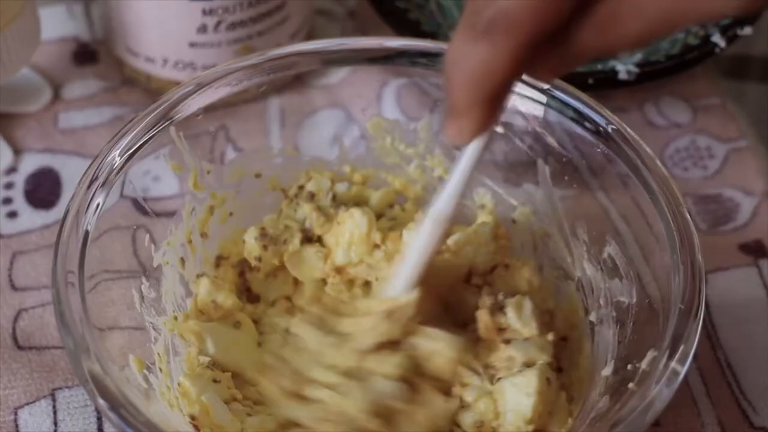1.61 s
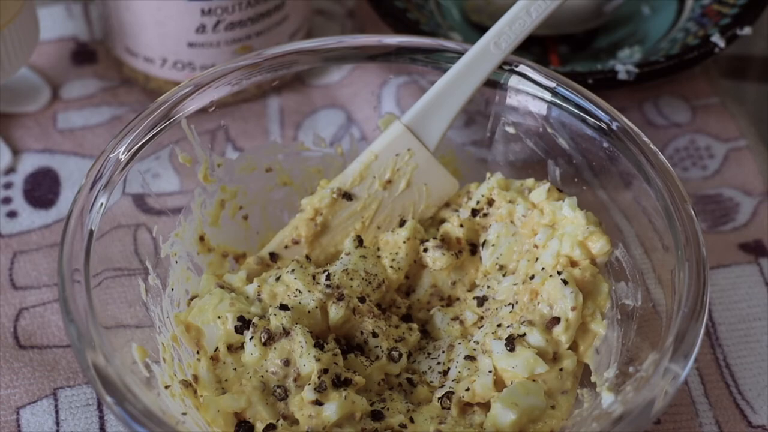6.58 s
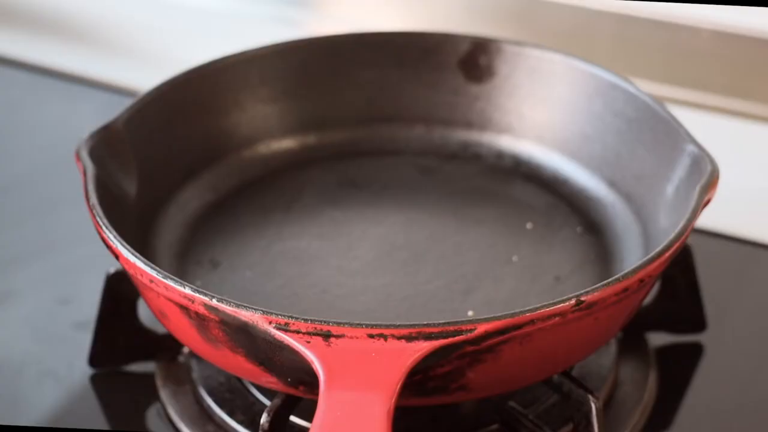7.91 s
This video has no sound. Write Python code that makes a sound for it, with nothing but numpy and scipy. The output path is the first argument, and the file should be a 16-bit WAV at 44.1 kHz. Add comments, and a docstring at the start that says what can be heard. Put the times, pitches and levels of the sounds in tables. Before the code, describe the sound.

After a metal spoon rattles down, soft wet stirring clicks give way to a pepper mill crunching peppercorns over a low hum.

```python
"""A metal spoon drops into a dish, clinks and rattles to rest. A silicone spatula then stirs mashed
egg in a glass bowl: air pockets pop in small wet clicks over a sticky crackle. Last, a pepper mill
is twisted over the bowl, its burr hissing as peppercorns snap and ring its body.
A few knocks on the kitchen table; a low mains hum, room rumble and microphone hiss throughout."""
import sys
import numpy as np
from scipy import signal
from scipy.fft import rfft, irfft
from scipy.io import wavfile
from scipy.ndimage import uniform_filter1d

SR = 44100
rng = np.random.default_rng(int(sys.argv[2]) if len(sys.argv) > 2 else 0)


def store_pcm(level_fs):
    """Save levels as 16-bit WAV."""
    pcm = np.round(np.clip(level_fs, -1, 1) * 32767).astype(np.int16)
    wavfile.write(sys.argv[1], SR, np.atleast_2d(pcm).T)


N = 355446
TIME = np.arange(N) / SR
SHORT = TIME[:SR // 2]

# Mill twists. Each row: start in s, length in s, burr rub in dB, time of a bite in s, its crunch in dB.
TWISTS = [(4.328, 0.33, -41, 4.55, -38), (4.825, 0.13, -45.5, 4.93, -32), (5.236, 0.32, -43, 5.36, -35.5),
          (5.584, 0.41, -44, 5.78, -33), (5.935, 0.39, -62, 5.99, -53.5), (6.258, 0.081, -43, 5.5, -53),
          (6.418, 0.24, -42, 6.54, -73), (7.315, 0.38, -50, 7.45, -61), (7.722, 0.047, -47, 7.92, -46)]


def mill():
    """Peppercorns snap, split their husks and ring the mill's body; the grist crunches at each bite."""
    # Each row: time in s, snap level in dB, snap centre in Hz, body level in dB.
    cracks = [(4.4160, -9.5, 3020, -11.5), (4.476, -22, 1890, -22), (4.4940, -12.5, 3580, -11.5),
              (4.499, -6.5, 2920, -15.5), (4.849, -27, 1570, -33), (4.87, -19.5, 1360, -27),
              (4.884, -40, 3000, -26), (4.915, -24, 2200, -43), (4.9417, -8, 5200, -11.5),
              (4.9424, -4.5, 3170, -12), (5.286, -24, 3630, -42), (5.292, -27, 2000, -28),
              (5.304, -29, 1930, -11), (5.339, -28, 2400, -27), (5.3509, -6.5, 2520, -13),
              (5.354, -11, 9700, -24), (5.433, -16.5, 2030, -19.5), (5.7267, -2, 4800, -6),
              (5.729, -8.5, 6200, -12), (5.743, -22, 3500, -11.5), (5.812, -10, 5130, -32),
              (5.8255, -14, 2580, -12.5), (5.8320, -14.5, 4370, -9), (5.9237, -18.5, 3830, -26),
              (6.324, -39, 1600, -56), (7.43, -29.5, 1700, -33), (7.45, -30, 1680, -38),
              (7.496, -31, 1460, -53), (7.842, -41, 2490, -37), (7.892, -36, 3740, -39)]
    # Each row: frequency in Hz, level in dB, T60 in s.
    body_modes = [(335, -5, .026), (395, -4, .026), (560, -10, .014), (800, -7, .013), (1090, -2, .05),
                  (1160, -1, .065), (1440, 3, .022), (1800, 6, .011), (2170, 6, .02), (2960, 6, .036),
                  (3130, 3, .028), (3770, -2, .013), (4330, 5, .022), (5450, 0, .015), (6700, -6, .01)]
    # Each row: frequency in Hz, gain in dB.
    grist_spectrum = [(150, 12), (330, -8), (600, -3.5), (1200, 1), (1800, -2.5), (3000, 1.5), (5000, -15),
                      (8000, -29), (14000, -31)]
    body_pan_db, snap_pan_db = -4.5, 1.7  # body sits right of the mouth
    bites = sum(amp(db) * swell(s, half_s=0.054) for _, _, _, s, db in TWISTS)
    loose_grist = amp(-13) * twisting()
    grist = evened(colour(grains(per_s=1100, spread_db=4), grist_spectrum))
    out = pan(grist * (bites + loose_grist), body_pan_db)
    for s, snap_db, hz, body_db in cracks:
        fade_s = min(0.00072 * 2 ** (-snap_db / 8), 0.0056)  # hard corns break at once, weak ones crumble
        crack = snap(hz, fade_s, breadth=1.45, front=1.1)
        husk = amp(-9.5) * snap(hz=7000, fade_s=0.005, breadth=3.3)
        body = amp(body_db) * ring(body_modes, detune=0.06)
        add(out, s, pan(amp(snap_db) * (crack + husk), snap_pan_db) + pan(body, body_pan_db))
    return colour(out, [(40, -28), (150, -39), (290, 0.5), (1000, -1.5)])  # little bass below about 300 Hz


def burr():
    """The hard burr hisses as it rubs in its ring and sings thinly in fits; grit skids along it."""
    # Each row: frequency in Hz, gain in dB.
    rub_spectrum = [(1500, -6), (4000, 0.5), (5400, 4.5), (7000, 6), (8000, -2), (9000, 6), (11500, 10.5),
                    (12400, -17), (13500, -25)]
    grit_spectrum = [(1500, -13), (3800, -25), (4800, 7), (6200, 7.5), (7500, 2), (9000, 3), (12000, -17)]
    # Each row: frequency in Hz, level in dB, T60 in s.
    burr_modes = [(7440, 1, 0.015), (13000, -1, 0.0095)]
    # Each row: start in s, level in dB, fade in s.
    skids = [(6.161, -45, .016), (6.257, -39.5, 0.013), (6.295, -36, .004), (6.305, -30.5, 0.01),
             (6.322, -44, 0.036), (6.346, -38, 0.0091), (6.36, -39, 0.0074), (6.3724, -26, 0.0026)]
    skid_attack_s = 0.0007
    hiss = np.array([colour(grains(per_s=1200, spread_db=10), rub_spectrum) for _ in range(2)])
    tones = np.array([excite(grains(per_s=1500, spread_db=6.5), ring(burr_modes)) for _ in range(2)])
    fits = amp(4 * drift(hz=25))
    rub = amp(-3.5) * evened(hiss) + amp(0.5) * evened(tones * fits)
    grit = evened(colour(grains(per_s=6800, spread_db=4.5), grit_spectrum))
    skidding = sum(amp(db) * held(s, skid_attack_s, skid_attack_s, fade_s) for s, db, fade_s in skids)
    return rub * (twisting() + amp(-3) * skidding) + grit * skidding


def twisting():
    """Rub envelope: each twist of the wrist builds, holds and lets go."""
    return sum(amp(db) * held(s, length_s, attack_s=0.044, release_s=0.028)
               for s, length_s, db, _, _ in TWISTS)


def spoon():
    """The spoon lands handle first, bounces and chatters to rest; each channel has its own mode mix."""
    # Each row: time in s, ring in dB, tick in dB, tick centre in Hz, handle's share of the blow (0-1).
    hits = [(.7062, -7.5, -17.5, 4200, 1), (.8020, -28, -28, 5000, .7), (.8572, -3, -6.5, 10500, .1)]
    # Each row: start in s, length in s, level in dB, handle's share (0-1).
    rattles = [(.708, .008, -27.5, 1), (.802, .05, -34, .55), (.860, .148, -23, 0), (1.02, .018, -31, 0)]
    out = np.zeros((2, N))
    for channel in out:
        for s, length_s, db, handle in rattles:
            force = amp(db) * held(s, length_s, attack_s=0.0014, release_s=0.011)
            channel += chatter(spoon_modes(handle), force)
        for s, ring_db, tick_db, hz, handle in hits:
            clink = amp(ring_db) * ring(spoon_modes(handle), detune=0.002)
            tick = amp(tick_db) * snap(hz, fade_s=0.012, breadth=2.4, front=0.3)
            add(channel, s, clink + tick)
    return pan(out, db=0.8)


def spoon_modes(handle):
    """Modes of spoon on dish for a blow between the spoon's bowl (0) and its handle (1)."""
    # Each row: frequency in Hz, level for a handle blow in dB, for a bowl blow in dB, T60 in s.
    modes = [(700, -16, -29, .15), (1770, 0, -9, .09), (1814, -6, -6, .33), (2150, -15, -23, .06),
             (2330, -16, -25, .06), (2640, -11, -21, .06), (2900, -12, -23, .06), (3310, -14, -16, .08),
             (3720, -14, -22, .06), (3985, -11, -3, .08), (4016, -8, -1, .17), (5144, -7, -2.5, .11),
             (5240, -18, -6, .08), (5500, -15, -16, .12), (5720, -15, -18, .12), (6480, -16, -14, .09),
             (6735, -18, -6, .08), (6788, -18, -5.5, .18), (6900, -4, -8, .11), (7380, -20, -2, .15),
             (7600, -18, -15, .12), (8560, -18, -11, .1), (8912, -5, -8, .13), (9722, -22, -8, .11),
             (9840, -13, -1.5, .15), (10181, -20, -7, .13), (10448, -22, -3.5, .2), (11343, -20, 1, .17),
             (11950, -2, -22, .05), (12380, -10, -26, .08), (13340, -25, 0, .13), (14130, 0, -16, .04),
             (15450, -8, -6, .08)]
    return [(hz, handle * handle_db + (1 - handle) * bowl_db, t60_s)
            for hz, handle_db, bowl_db, t60_s in modes]


def chatter(modes, force, points=4):
    """Rapid contacts: free modes ring on unsteadily while a few touching points buzz and scrape."""
    # Each row: frequency in Hz, gain in dB.
    scrape_spectrum = [(500, -63), (2000, 11), (4700, 1), (7000, 17), (10000, 8), (11600, 2), (12600, -20)]
    contacts = np.array([evened(grains(per_s=220, spread_db=1.5)) for _ in range(points)])
    contacts = contacts * force / np.sqrt(points)
    damping = np.exp(-SHORT / 0.01)  # pressed on the dish, modes are damped and detuned
    buzz = sum(excite(point, ring(modes, detune=0.04) * damping) for point in contacts)
    scrape = evened(colour(grains(per_s=450, spread_db=3.5), scrape_spectrum)) * force
    free = sum(excite(point, ring(modes, detune=0.003)) * amp(3 * drift(hz=45) - 1) for point in contacts)
    return free + amp(-4.5) * buzz + amp(-8.5) * scrape


def spatula():
    """Air pockets pop as the spatula folds the egg, over a sticky crackle and a dull squash."""
    # Each row: middle of a stroke in s, crackle level in dB.
    strokes = [(1.759, -63), (1.98, -55), (2.25, -55.5), (2.53, -58), (2.801, -52), (3.031, -68),
               (3.389, -54), (3.678, -82), (4.101, -79)]
    # Loudest wet clicks. Each row: time in s, level in dB, centre in Hz, fade in s, band edge / centre.
    squelches = [(1.693, -30.5, 7100, .002, 1.5), (1.725, -25, 4640, 0.014, 2.3),
                 (1.829, -33, 5600, 0.0003, 1.7), (1.867, -35, 4500, 0.00041, 2.3),
                 (1.926, -34, 3020, 0.00053, 1.7), (1.947, -31.5, 5460, 0.0036, 2.1),
                 (2.113, -33.5, 5600, 0.00037, 1.8), (2.178, -35, 7960, .001, 1.1),
                 (2.199, -21.5, 6400, 0.0015, 1.44), (2.205, -23, 3880, 0.016, 2.7),
                 (2.366, -31, 6400, .0012, 2.1), (2.421, -37, 7950, 0.0011, 0.93),
                 (2.472, -28, 5300, 0.0013, 1.35), (2.568, -44, 7040, .0006, 1.4),
                 (2.684, -41, 3400, 0.0017, 2.3), (2.756, -35, 2800, 0.00043, 2.7),
                 (2.761, -38, 4800, 0.0024, 2.3), (2.798, -43, 3200, 0.0022, 2.4),
                 (2.855, -39, 3800, 0.0011, 1.4), (2.932, -38.5, 6000, .0005, 1.7),
                 (2.975, -36, 3000, 0.00073, 2.6), (2.992, -30.5, 3820, 0.00036, 2.3),
                 (3.002, -30.5, 3730, 0.0005, 1.8), (3.092, -28.5, 7050, 0.00042, 1.8),
                 (3.153, -33.5, 7600, 0.00075, 1.3), (3.309, -34.5, 4000, .002, 1.5),
                 (3.346, -30, 5000, 0.0037, 1.7), (3.361, -19.5, 3220, 0.0019, 1.73),
                 (3.364, -37.5, 1300, .004, 1.6), (3.376, -29, 3000, 0.0022, 1.7),
                 (3.405, -40, 1400, .004, 1.6), (3.412, -26.5, 2680, 0.0011, 1.6),
                 (3.431, -24.5, 3430, 0.00065, 1.7), (3.625, -37, 5240, .001, 1.1),
                 (3.637, -33.5, 3370, 0.0011, 3.1), (3.7185, -38, 6940, .001, 1.04),
                 (3.756, -24, 4230, 0.00089, 1.8), (3.8568, -16.5, 3650, 0.00086, 1.32),
                 (3.858, -24, 1900, 0.00077, 1.5), (3.862, -32, 9500, .0006, 1.1),
                 (3.970, -37.5, 1620, 0.0027, 1.15), (4.040, -30.5, 4340, 0.00062, 1.2),
                 (4.053, -32, 5200, 0.00071, 1.8), (4.093, -34, 6800, .0006, 1.8),
                 (4.174, -36, 1380, 0.0057, 1.5), (4.237, -34, 5300, 0.00096, 2.2),
                 (4.296, -36, 8500, .001, 1.8)]
    # Each row: frequency in Hz, gain in dB.
    crackle_spectrum = [(300, -39), (1500, 13), (3500, 6.5), (7000, 14.5), (12000, -26)]
    squash_spectrum = [(120, -25), (270, 2.0), (450, -4.5), (1200, -33), (4000, -56)]
    half_s = 0.042
    effort = sum(amp(db) * swell(s, half_s) for s, db in strokes)
    clinging = amp(-58) * held(start_s=1.65, length_s=2.6, attack_s=half_s, release_s=half_s)
    crackle = evened(colour(grains(per_s=200, spread_db=5.5), crackle_spectrum))
    squash = evened(colour(grains(per_s=400, spread_db=5), squash_spectrum))
    out = (crackle + amp(-6) * squash) * (effort + clinging)
    # Three small pops per stroke; columns as in squelches.
    pops = [(s + half_s * offset, -55.5 + 4 * strength, 4850 * 2 ** (0.69 * pitch), 0.0005, 1.5)
            for s, _ in strokes for offset, strength, pitch in rng.uniform(-1.3, 1, size=(3, 3))]
    for s, db, hz, fade_s, breadth in squelches + pops:
        add(out, s, amp(db) * snap(hz, fade_s, breadth, order=2, front=0.71))
    return pan(out, db=1)


def knocks():
    """Bumps on the cloth-covered table: a low thud under a short clack."""
    # Each row: time in s, thud in dB, thud centre in Hz, clack in dB, clack centre in Hz, pan in dB.
    bumps = [(1.194, -27.5, 245, -38, 686, -6), (7.5807, -20.5, 332, -14.5, 1240, -11.5),
             (7.598, -39, 390, -26.5, 1680, 12)]
    out = np.zeros((2, N))
    for s, thud_db, thud_hz, clack_db, clack_hz, pan_db in bumps:
        thud = amp(thud_db) * snap(thud_hz, fade_s=0.016, breadth=1.52)
        clack = amp(clack_db) * snap(clack_hz, fade_s=0.0039, breadth=2.05)
        add(out, s, pan(thud + clack, pan_db))
    return out


def mains_hum():
    """Mains hum beats against a narrow noise drone; the level dips or swells briefly."""
    # Each row: middle in s, half length in s, level change in dB.
    sags = [(.03, 0.18, -3), (1.14, 0.26, -7.5), (4.004, 0.019, 9), (5.28, 0.077, -10)]
    hum_hz, drone_hz, drone_half_width_hz = 100.2, 99.8, 2.36
    tone = amp(-41) * np.sin(2 * np.pi * hum_hz * TIME)
    drone = noise(lambda hz: amp(-56) / np.hypot(1, (hz - drone_hz) / drone_half_width_hz))
    sag_db = sum(db * swell(s, half_s) for s, half_s, db in sags)
    return amp(sag_db) * (tone + drone)


def room_rumble():
    """Steady rumble and air, near mono in the bass."""
    # Each row: frequency in Hz, mid noise density in dB.
    spectrum = [(20, -85), (35, -79), (52, -66.5), (75, -76.5), (120, -75.5), (143, -67.5), (220, -76),
                (350, -77), (600, -81), (1100, -81.5), (2200, -87.5), (5000, -110), (11000, -104),
                (14000, -125)]
    # Each row: frequency in Hz, side over mid in dB.
    width = [(30, -30), (70, -10), (110, -19), (200, -7.5), (400, -3), (1200, 0.5)]
    mid = noise(lambda hz: amp(read(spectrum, hz)))
    side = noise(lambda hz: amp(read(spectrum, hz) + read(width, hz)))
    return stereo(mid, side)


def microphone_hiss():
    """Treble noise, mostly opposed in the two channels."""
    # Each row: frequency in Hz, relative density in dB.
    spectrum = [(500, -100), (2000, -93.5), (4200, -86.5), (6300, -94.5), (7600, -85), (9000, -80.5),
                (10200, -72.5), (11100, -72.5), (11700, -88.5), (12300, -95), (13200, -125)]
    mid, side = (noise(lambda hz: amp(read(spectrum, hz) + 3.5)) for _ in range(2))
    return stereo(amp(-7.5) * mid, side)


def whine(hz=2550):
    """A faint, brief tone wavering in level and pitch."""
    envelope = held(start_s=0.11, length_s=0.35, attack_s=0.12, release_s=0.12)
    level_db = -58.5 + 5.6 * drift(hz=25)
    return envelope * amp(level_db) * np.sin(2 * np.pi * hz * TIME + 0.71 * drift(hz=35))


def kitchen(x):
    """Small room: sparse reflections, each band dying at its own rate."""
    # Each row: frequency in Hz, T60 in s.
    decay = [(200, 0.29), (1500, 0.3), (5000, 0.31), (12000, 0.22)]
    reflections_per_s, shape = 4000, (2, len(SHORT))
    taps = rng.choice([-1., 1.], shape) * (rng.random(shape) < reflections_per_s / SR)
    early_boost = 1 + 2.02 * np.exp(-SHORT / 0.0065)  # off the table and bowl
    hz, s, bands = signal.stft(taps * (SHORT > .001) * early_boost, SR, nperseg=256)
    _, tail = signal.istft(bands * amp(-60 * s / read(decay, hz)[:, None]), SR, nperseg=256)
    tail /= np.linalg.norm(tail, axis=1, keepdims=True)
    return signal.fftconvolve(x, tail, axes=1)[:, :N]


def microphone(x):
    """A small pair of ports: a bright peak, near mono in the bass, wide in the treble."""
    # Each row: frequency in Hz, gain in dB.
    response = [(100, 8), (6000, -0.5), (8200, 1.5), (10300, 4.5), (11500, -2), (12600, -2), (14000, -21.5),
                (16000, -18)]
    # Each row: frequency in Hz, side gain in dB.
    width = [(150, -17), (500, -8.5), (1500, -1), (4000, 3), (9000, 3.5), (14000, 9)]
    left, right = colour(x, response)
    return stereo((left + right) / 2, colour((left - right) / 2, width))


def snap(hz, fade_s, breadth, order=1, front=0):
    """A sharp front and a dying burst of tiny fractures, band-passed around hz."""
    burst = rng.choice([-1, 1], len(SHORT)) * np.exp(-SHORT / fade_s)
    burst[0] += np.sign(burst[0]) * front * np.linalg.norm(burst)
    breadth = max(breadth, 1.1)
    band = signal.butter(order, [hz / breadth, min(hz * breadth, SR * .45)], "band", fs=SR, output="sos")
    return unit_blow(signal.sosfilt(np.vstack([band, band]), burst + 1e-18))


def ring(modes, detune=0):
    """Decaying modes after one blow; a changing grip detunes them."""
    hz, db, t60_s = np.transpose(modes)[:, :, None]
    envelope = amp(db - 60 * SHORT / t60_s)
    pitch_hz = hz * (1 + detune * rng.uniform(-1, 1, hz.shape))
    polarity = rng.choice([-1, 1], hz.shape)
    return unit_blow((polarity * envelope * np.sin(2 * np.pi * pitch_hz * SHORT)).sum(0))


def grains(per_s, spread_db):
    """Random tiny impacts, a few much larger than the rest."""
    size = amp(spread_db * np.minimum(rng.exponential(1, N), 3.5))
    return size * rng.choice([-1, 1], N) * (rng.random(N) < per_s / SR)


def excite(contacts, response):
    """Each contact sets off the response; power is kept."""
    return signal.oaconvolve(contacts, response / np.linalg.norm(response))[:N]


def noise(density):
    """Steady noise with amplitude density(hz) per root Hz."""
    return irfft(rfft(rng.standard_normal(N)) * density(np.fft.rfftfreq(N, 1 / SR)), N) * np.sqrt(SR / 2)


def drift(hz):
    """Random wander below hz, unit rms."""
    return evened(noise(lambda f: 1 / (1 + (f / hz) ** 4)))


def colour(x, points):
    """Minimum-phase filter from (Hz, dB) points; clicks keep their sharp front."""
    log_gain = np.log(amp(read(points, abs(np.fft.fftfreq(4096, 1 / SR)))))
    taps = np.fft.ifft(np.exp(np.conj(signal.hilbert(log_gain)))).real[:2048]
    return signal.oaconvolve(x, taps[None] if x.ndim > 1 else taps, axes=-1)[..., :N]


def held(start_s, length_s, attack_s, release_s):
    """Envelope: linear rise, hold, exponential release."""
    age_s = TIME - start_s
    return np.clip(age_s / attack_s, 0, 1) * np.exp(-np.clip((age_s - length_s) / release_s, 0, 40))


def swell(middle_s, half_s):
    """Bell-shaped envelope."""
    return np.exp(-np.minimum(((TIME - middle_s) / half_s) ** 2, 40))


def read(points, hz):
    """Interpolates on a log-frequency axis."""
    point_hz, value = np.transpose(points)
    return np.interp(np.log(hz + 1), np.log(point_hz + 1), value)


def amp(db):
    """Decibels to gain."""
    return 10 ** (np.asarray(db) / 20)


def evened(x):
    """Scales to unit rms."""
    return x / np.sqrt(np.mean(x ** 2) + 1e-20)


def unit_blow(x):
    """Scales to the energy of 1 ms at full level."""
    return x / np.sqrt(np.sum(x ** 2) * 1000 / SR + 1e-20)


def add(mix, s, sound):
    """Mixes a sound in at s seconds."""
    part = mix[..., round(s * SR):][..., :sound.shape[-1]]
    part += sound[..., :part.shape[-1]]


def pan(x, db):
    """Pans by db, left minus right."""
    return x * amp([[db / 2], [-db / 2]])


def stereo(mid, side):
    """Mid and side to left and right."""
    return np.array([mid + side, mid - side])


def scene():
    """Handling sounds in the room, through the microphone, over the background."""
    clink, rub, stir, blows = spoon(), burr(), spatula(), mill() + knocks()
    room = kitchen(amp(-5) * clink + amp(-0.5) * rub + amp(-4.5) * stir + amp(0.5) * blows)
    direct = amp(6.5) * clink + rub + stir + blows
    background = room_rumble() + mains_hum() + microphone_hiss() + whine()
    return microphone(direct + room) + background


def record(dry):
    """Gain control ducks after loud blows and recovers slowly; peaks clip; a low-pass follows."""
    threshold_db, fall_db_per_s, duck_db_per_db, cutoff_hz = -26.5, 32, 0.25, 16200
    power = signal.lfilter([1 / 400], [1, 1 / 400 - 1], (dry ** 2).mean(0))  # 9 ms average
    power_db = 10 * np.log10(power + 1e-12)
    fall_db = TIME * fall_db_per_s
    peak_db = np.maximum.accumulate(power_db + fall_db) - fall_db
    over_db = np.maximum(peak_db - threshold_db, 0)
    ducked = dry * amp(-duck_db_per_db * uniform_filter1d(over_db, size=100))
    low_pass = signal.firwin(255, cutoff_hz, window=("kaiser", 9), fs=SR)
    return signal.oaconvolve(np.clip(ducked, -1, 1), low_pass[None], "same")


dry = scene()
out = record(dry)
store_pcm(out)
```